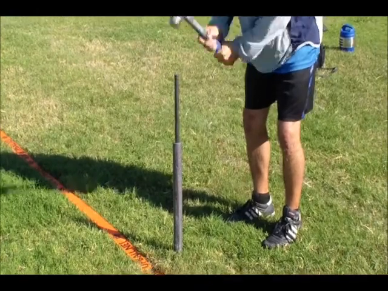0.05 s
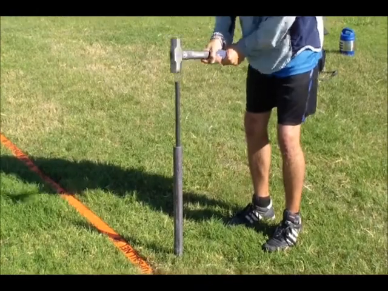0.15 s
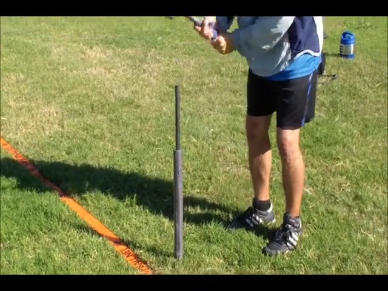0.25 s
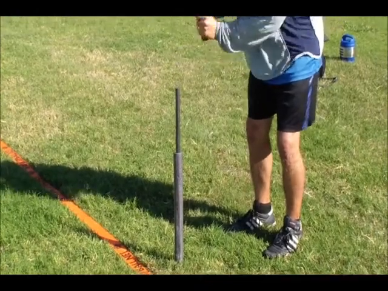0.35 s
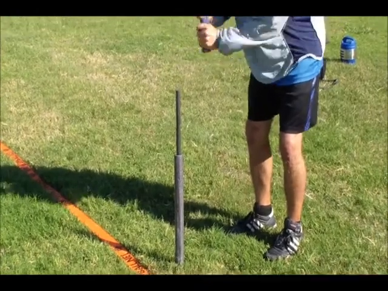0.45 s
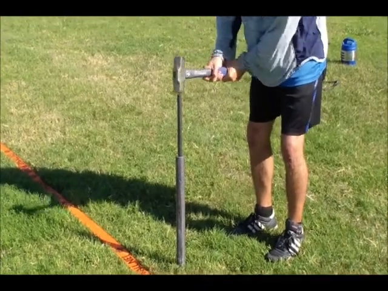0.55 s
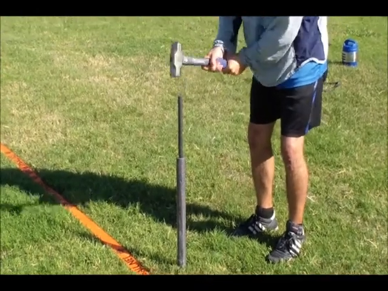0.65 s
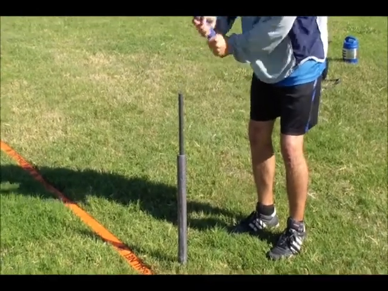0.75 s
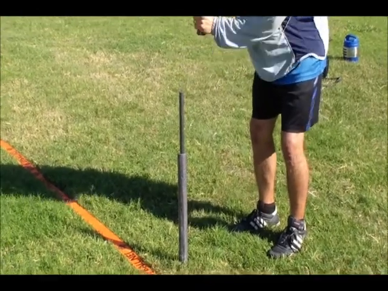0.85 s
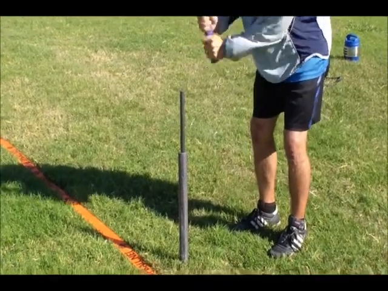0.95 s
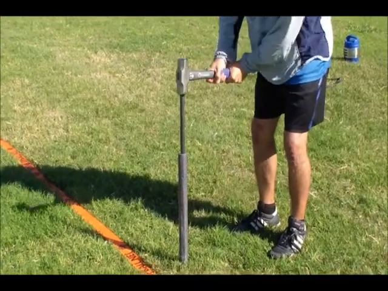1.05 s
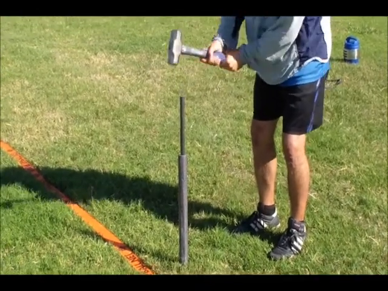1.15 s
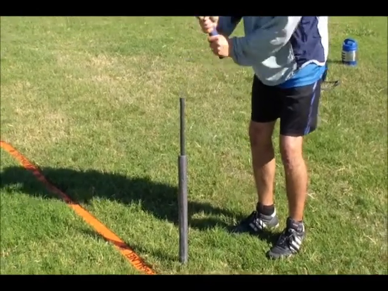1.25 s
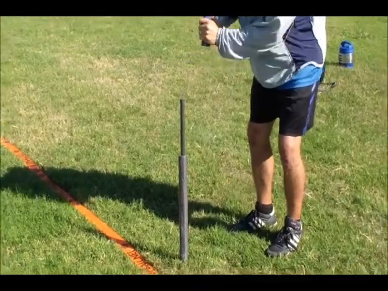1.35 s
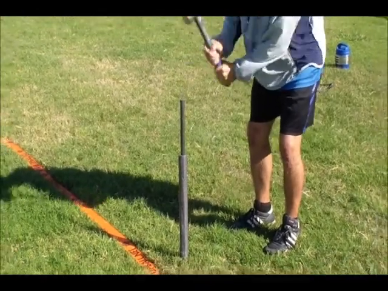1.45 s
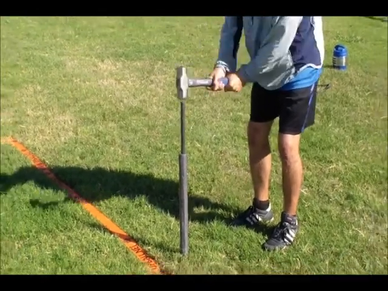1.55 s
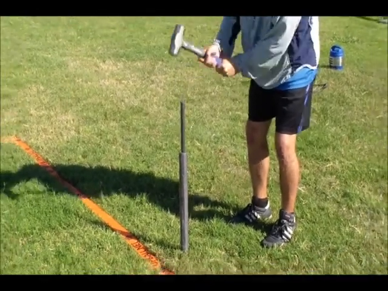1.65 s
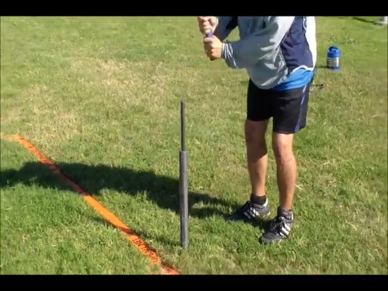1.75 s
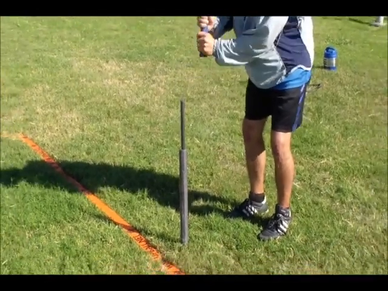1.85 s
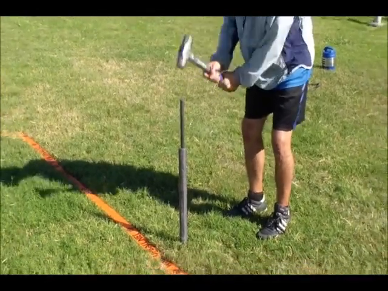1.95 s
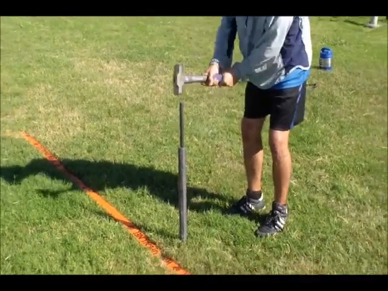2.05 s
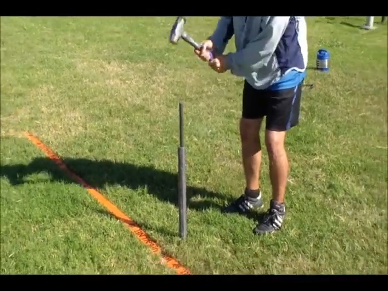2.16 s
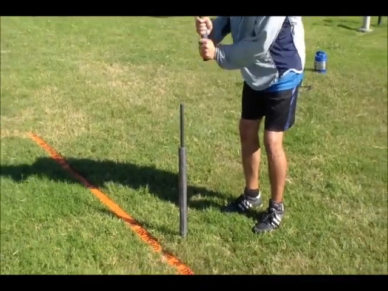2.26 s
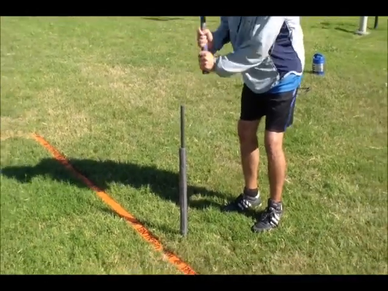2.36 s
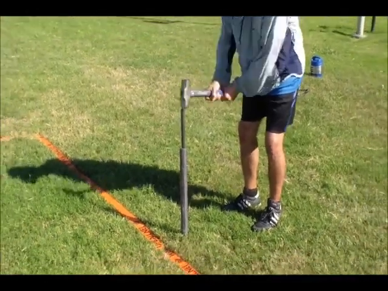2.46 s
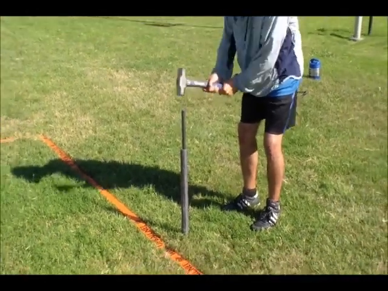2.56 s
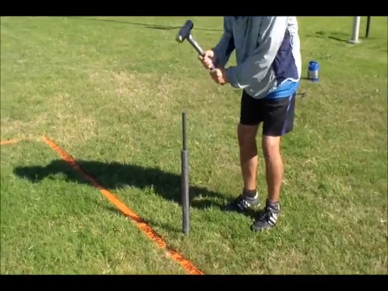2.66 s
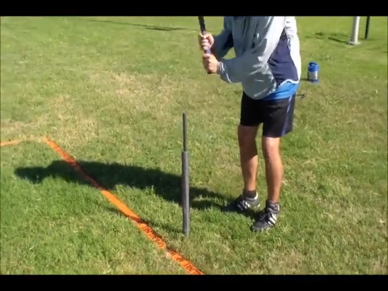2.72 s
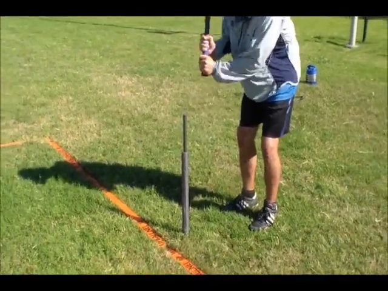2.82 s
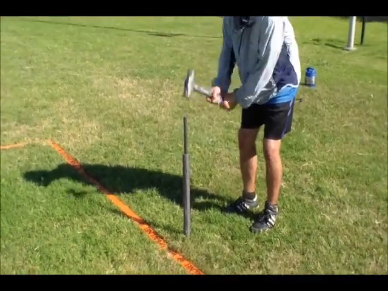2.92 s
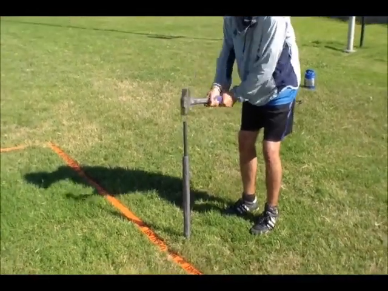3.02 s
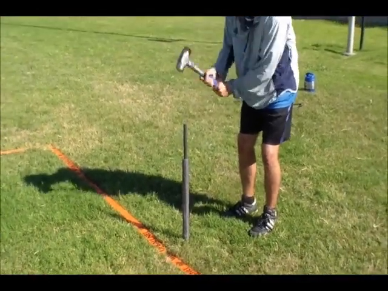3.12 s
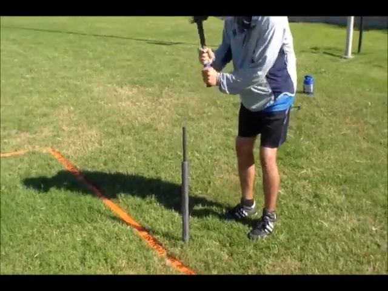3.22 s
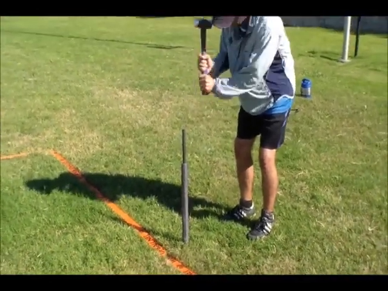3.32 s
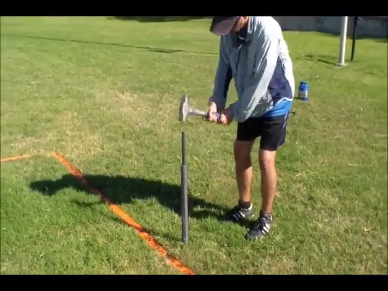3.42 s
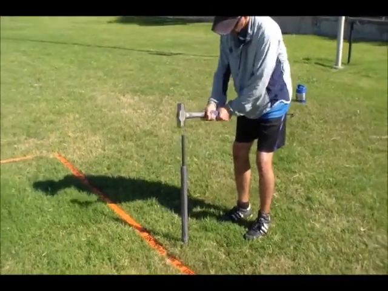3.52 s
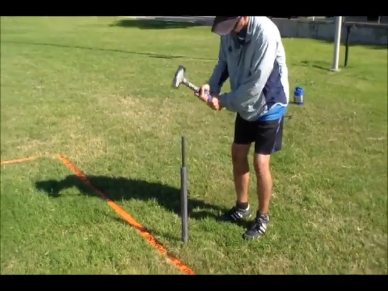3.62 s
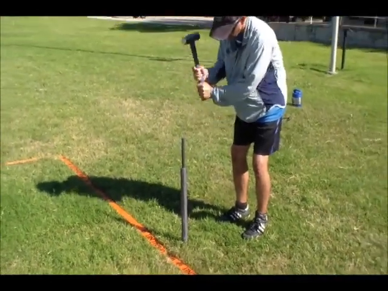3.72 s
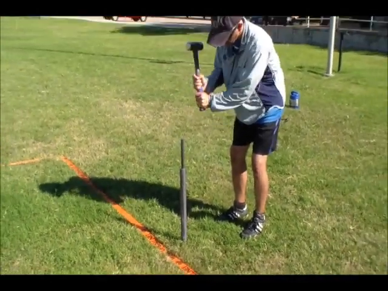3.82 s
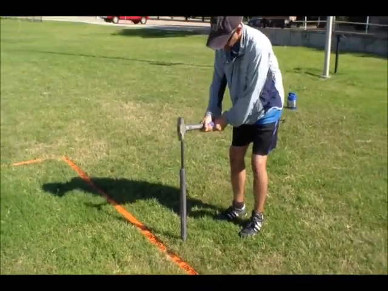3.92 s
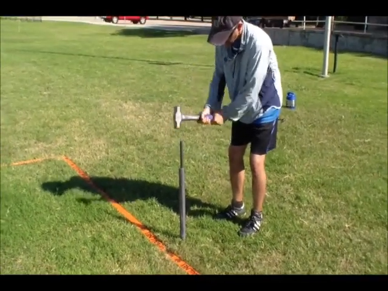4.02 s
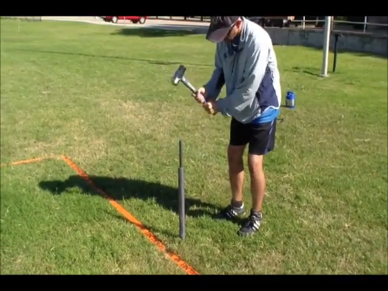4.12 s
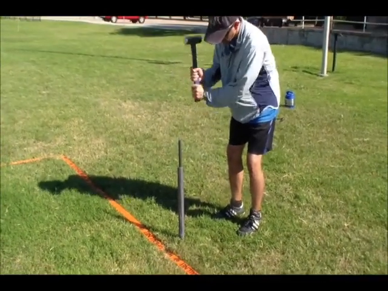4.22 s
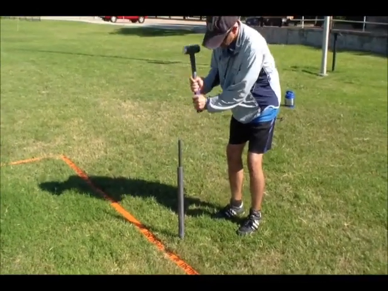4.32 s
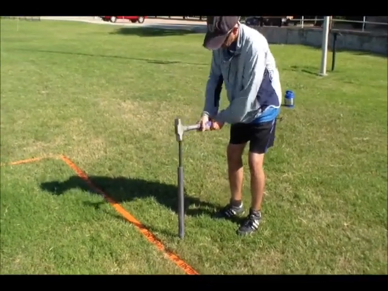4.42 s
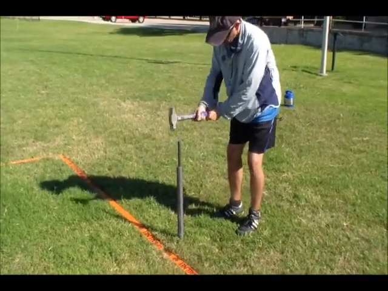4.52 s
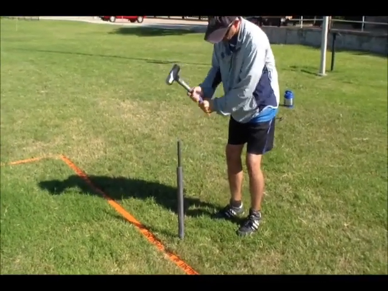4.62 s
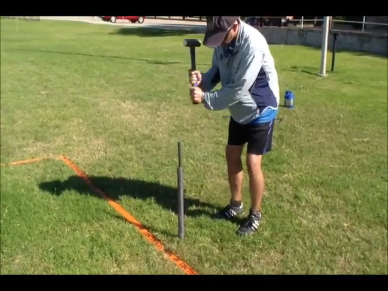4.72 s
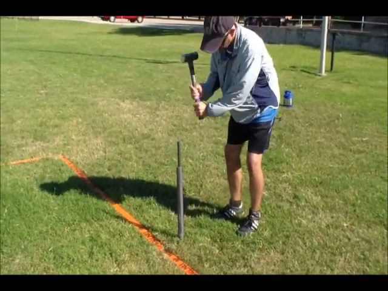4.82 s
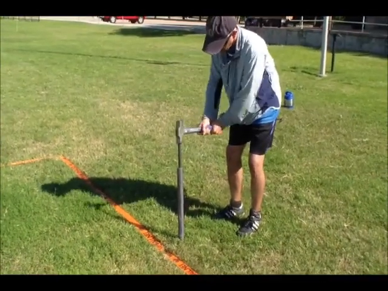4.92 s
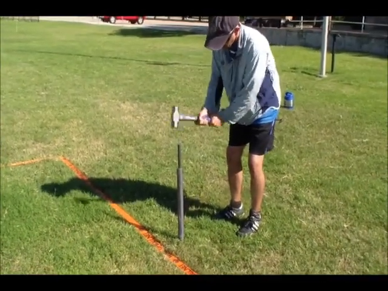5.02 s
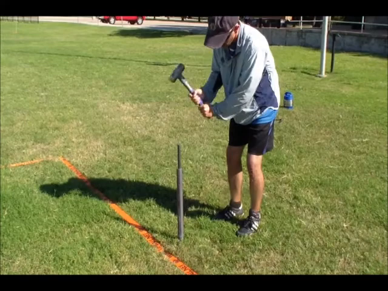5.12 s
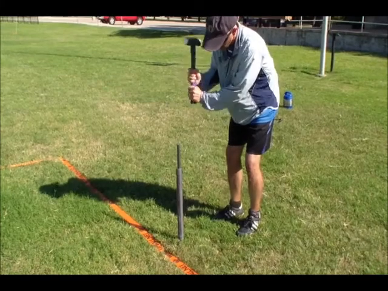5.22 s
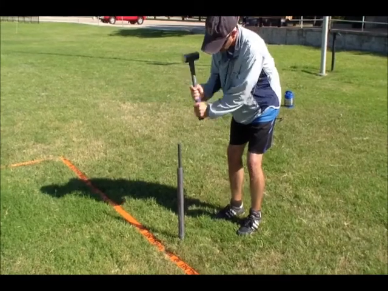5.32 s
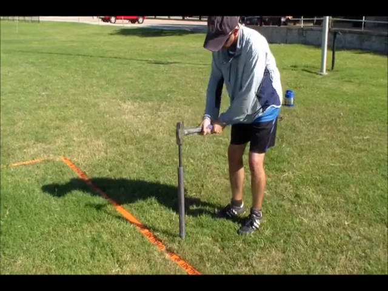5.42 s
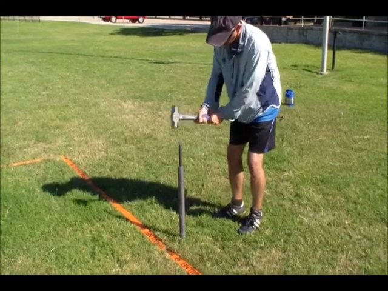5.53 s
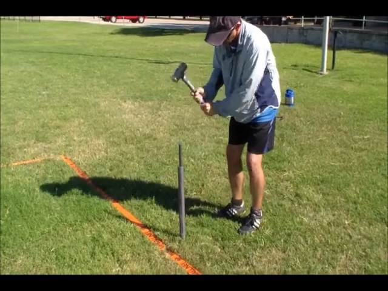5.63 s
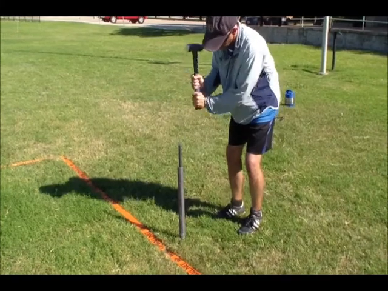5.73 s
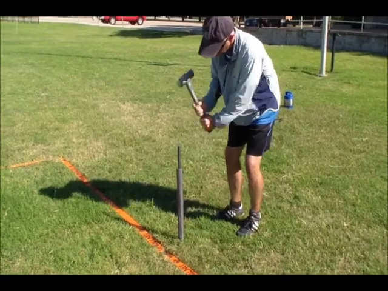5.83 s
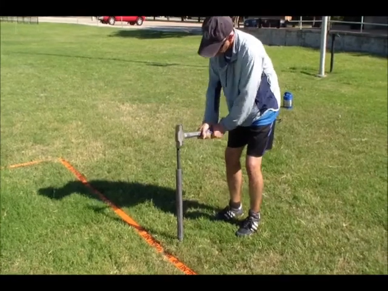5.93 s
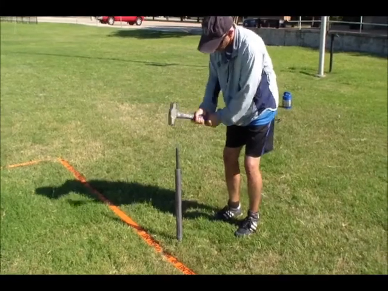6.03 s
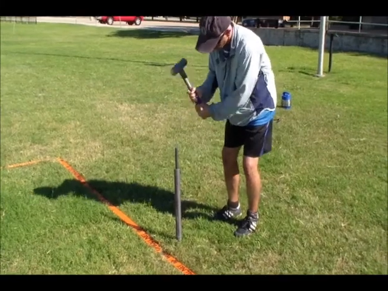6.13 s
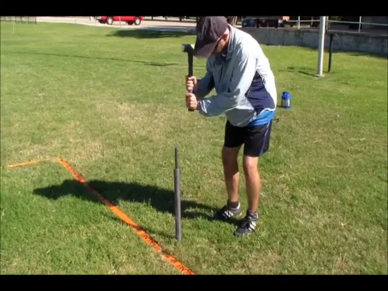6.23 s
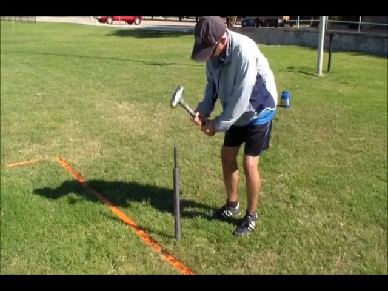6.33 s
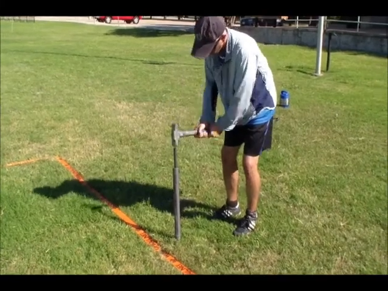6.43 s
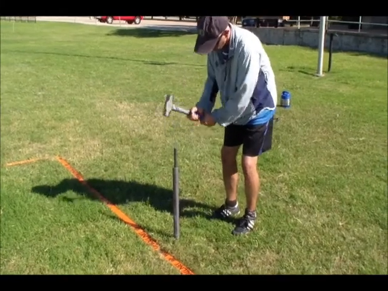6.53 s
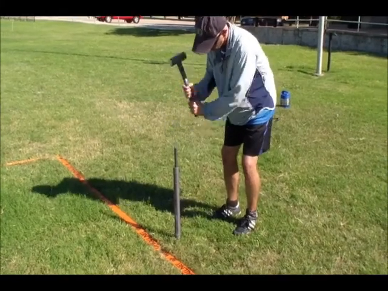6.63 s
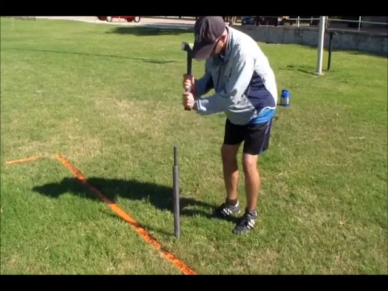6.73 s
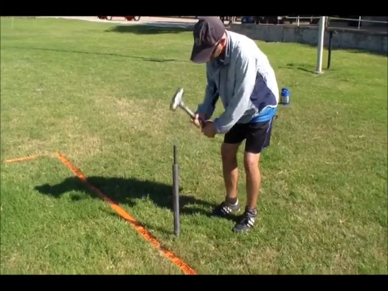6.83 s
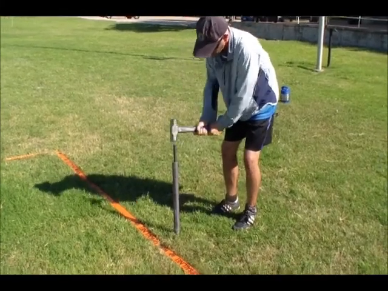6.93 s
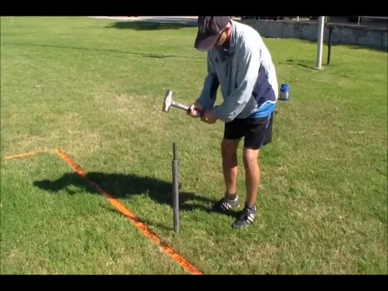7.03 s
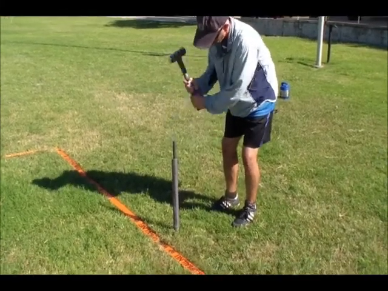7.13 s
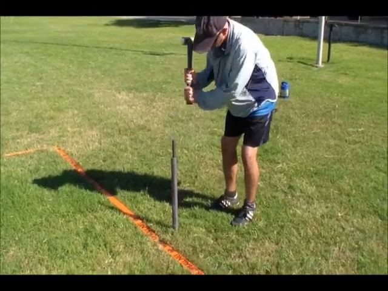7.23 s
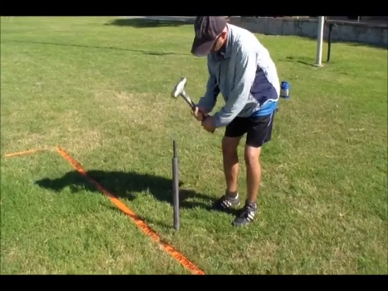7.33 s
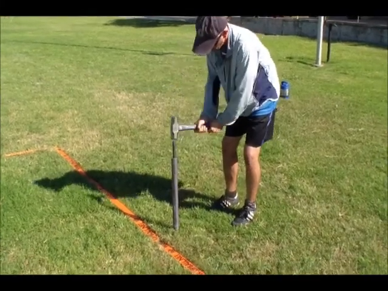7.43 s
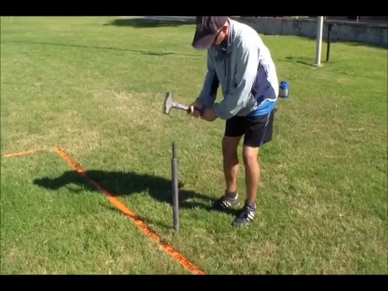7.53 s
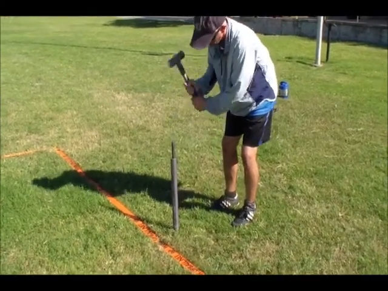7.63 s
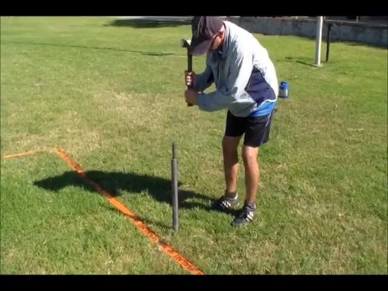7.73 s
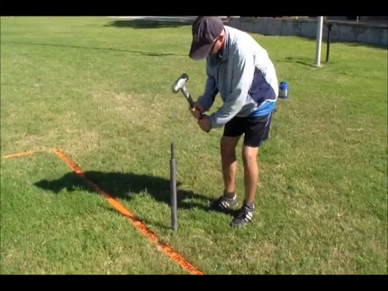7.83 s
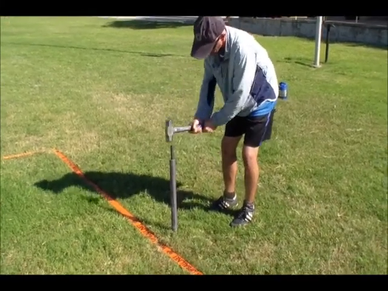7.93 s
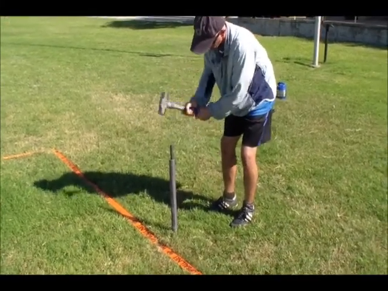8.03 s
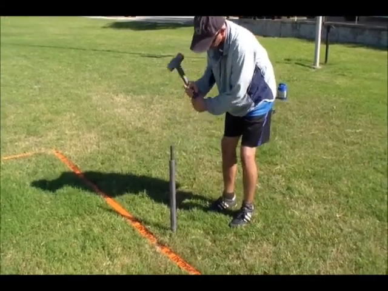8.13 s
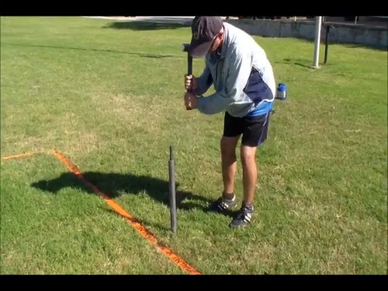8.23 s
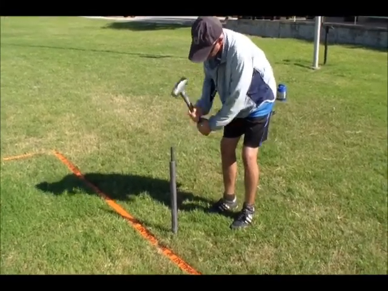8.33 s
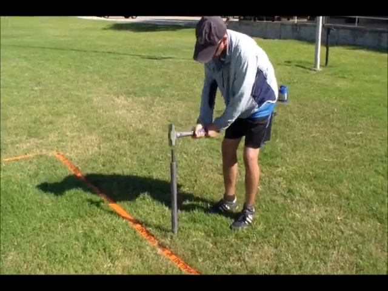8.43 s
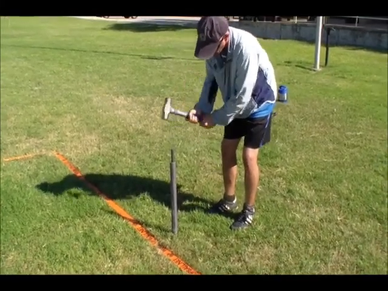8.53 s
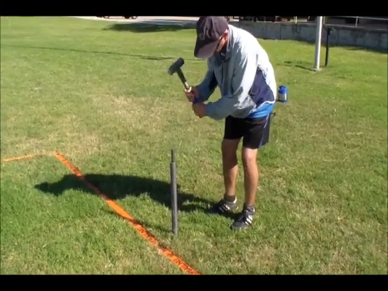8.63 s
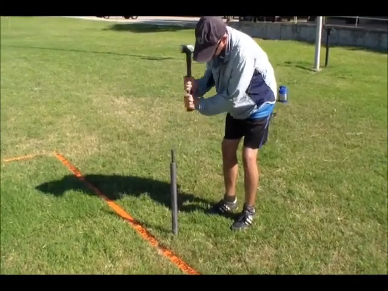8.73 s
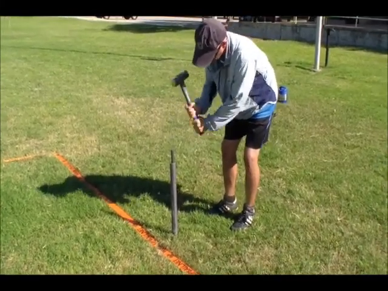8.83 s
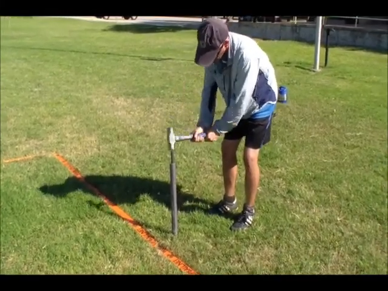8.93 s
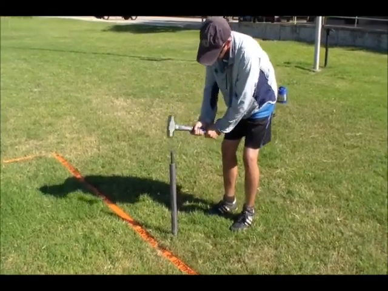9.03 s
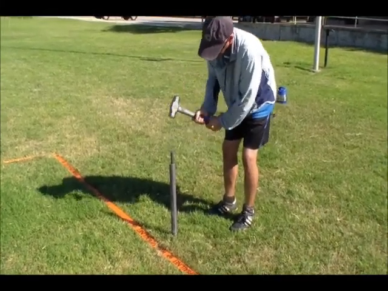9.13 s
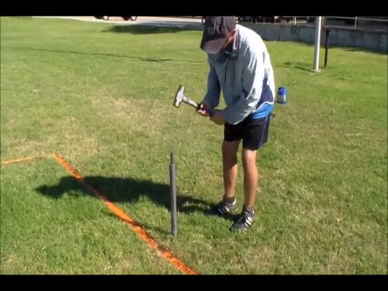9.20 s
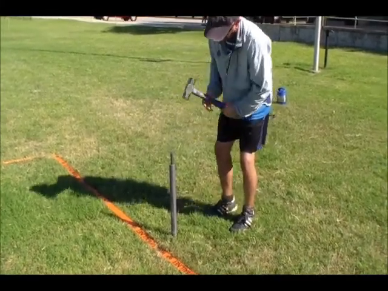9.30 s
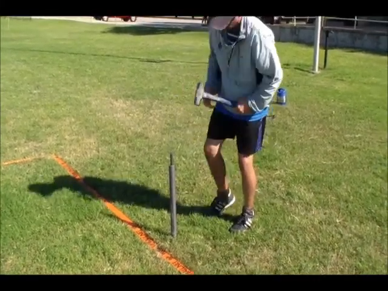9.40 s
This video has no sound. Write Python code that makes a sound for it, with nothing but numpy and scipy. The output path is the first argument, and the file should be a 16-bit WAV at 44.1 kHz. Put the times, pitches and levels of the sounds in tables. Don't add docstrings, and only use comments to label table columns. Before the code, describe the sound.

Steady, overloaded metal-on-metal clanks on an open lawn, each with a quick sleeve rattle and short echo, above distant engine hum and soft insects.

```python
import sys
import numpy as np
from scipy import signal
from scipy.fft import rfft, irfft
from scipy.io import wavfile
from scipy.ndimage import uniform_filter1d

SR = 44100
rng = np.random.default_rng(int(sys.argv[2]) if len(sys.argv) > 2 else 0)


def bounce(signal):
    frames = np.transpose(np.atleast_2d(signal))
    limited = np.clip(frames, -1, 1)
    pcm = np.round(limited * 32767).astype(np.int16)
    wavfile.write(sys.argv[1], SR, pcm)


def attenuation_scalar(level_db):
    decades = np.asarray(level_db, float) / 20
    return 10 ** decades


N = 417230


def evened(x):
    return x / np.sqrt(np.mean(x ** 2) + 1e-20)


def read(points, hz):
    f, value = np.transpose(points)
    return np.interp(np.log(hz + 1), np.log(f + 1), value)


def add(mix, start_s, sound):
    part = mix[round(start_s * SR):][:len(sound)]
    part += sound[:len(part)]


def band(x, lo_hz, hi_hz):
    edges_hz = [lo_hz, min(hi_hz, SR / 2.2)]
    return signal.sosfilt(signal.butter(2, edges_hz, "bandpass", fs=SR, output="sos"), x)


def resonate(x, hz, width_hz):
    turn = np.exp(2j * np.pi * hz * np.arange(x.shape[-1]) / SR)
    r = np.exp(-np.pi * width_hz / SR)
    smooth = signal.lfilter([(1 - r) ** 2], [1, -2 * r, r * r], x / turn)
    return 2 * (turn * smooth).real


def ring(modes, level_db, luck):
    t = np.arange(SR // 2) / SR
    hz, db, t60_s = np.transpose(modes)[:, :, None]
    luck_db = 1.3 * luck[:len(modes), :1]
    phase = 1.3 * luck[:len(modes), 1:]
    decay = attenuation_scalar(level_db + db + luck_db - 60 * t / t60_s)
    return (decay * np.sin(2 * np.pi * hz * t + phase)).sum(0)


# (time [s], strength [dB], knock [dB], off-centre bending [dB], mallet head ring [dB])
BLOWS = [(0.1233, 2.5, -30, -22, -57), (0.5913, 1, -20, -15, -44), (1.0705, 1.5, -16.5, -11.5, -47),
         (1.5437, 0.5, -19.5, -8.5, -41), (2.0205, 2.5, -32, -6, -57), (2.4938, 5.5, -18.5, -6.5, -52),
         (2.9832, 6, -17.5, -9.5, -45), (3.4776, 3, -14.5, -19, -53), (3.9648, 3.5, -19, -15.5, -47),
         (4.4597, 3.5, -13.5, -37, -28.5), (4.9506, 4, -15.5, -16.5, -43), (5.451, 7.5, -15.5, -15, -52),
         (5.9286, 4.5, -13, -11, -51), (6.407, 5, -15.5, -11, -62), (6.9032, 6, -18.5, -31, -44),
         (7.4104, 3.5, -23.5, -16.5, -66), (7.921, 0.5, -19, -29, -46), (8.4212, 5.5, -21, -14.5, -42.5),
         (8.9406, -1, -20, -34, -51)]
# (frequency [Hz], level [dB], t60 [s])
KNOCK_MODES = [
    (370, -10.5, 0.013),
    (760, 1.5, 0.012),
    (990, -7.5, 0.024),
]
# (frequency [Hz], level [dB], t60 [s])
BENDING_MODES = [(1482, -4, 0.0083), (1922, 1.2, 0.0082), (2482, 3, 0.012), (3191, 6, 0.0063),
                 (3978, 2.5, 0.013), (4804, 2.5, 0.012), (6690, -1, 0.013), (7767, 5.5, 0.01),
                 (9850, 1.5, 0.0073), (10824, -3.5, 0.02), (11187, -2, 0.023), (13200, -3.5, 0.01)]
# (frequency [Hz], level [dB], t60 [s])
LENGTHWISE_MODES = [
    (2845, -3.5, .032),
    (5695, -2, .035),
    (8530, -1.5, .032),
    (11330, -6, .033),
    (14200, -13, .03),
]
# (frequency [Hz], level [dB], t60 [s])
HEAD_MODES = [
    (11010, 3, .8),
    (11013.6, 2.6, .8),
]


def blows():
    lengthwise_db, near_lengthwise_db = -8, 0.5
    out_crack_db, out_bending_db, out_lengthwise_db = 10, -2.5, 10.5
    out, t = np.zeros((2, N)), np.arange(SR // 2) / SR
    luck = rng.standard_normal((len(BLOWS), 4, 16, 2))
    noises = rng.standard_normal((len(BLOWS), SR // 2))
    lifted = np.exp(-(t / 0.235) ** 4)
    for (s, db, knock_db, bend_db, head_db), chance, noise in zip(BLOWS, luck, noises):
        bending = ring(KNOCK_MODES, db + knock_db + 6.5, chance[0])
        bending += ring(BENDING_MODES, db - 10, chance[1])
        bending += ring(BENDING_MODES[:2], db + bend_db + 6.5, chance[2])
        crack = attenuation_scalar(db - 7 - 60 * t / 0.018) * band(noise, 900, 11000)
        lengthwise = ring(LENGTHWISE_MODES, lengthwise_db, chance[3])
        add(out[0], s, crack + bending + attenuation_scalar(near_lengthwise_db) * lengthwise)
        outward = attenuation_scalar(out_crack_db) * crack + attenuation_scalar(out_bending_db) * bending
        add(out[1], s, outward + attenuation_scalar(out_lengthwise_db) * lengthwise)
        add(out[0], s, lifted * ring(HEAD_MODES, head_db, np.zeros((16, 2))))
    return out


# (time [s], level [dB])
BOUNCES = [(0.144, -13), (0.6075, -11), (1.084, -4.5), (1.5562, -9), (2.0356, -9.5), (2.5103, -4),
           (2.997, -4), (3.4683, -21.5), (3.4897, -20), (3.979, -13), (4.47, -1.5), (4.964, -17),
           (5.4633, -7.5), (5.9424, -6.5), (6.4195, -12.5), (6.9165, -8), (7.4238, -10.5), (7.9357, -13),
           (8.4384, -6), (8.952, -36)]


def bounces():
    sleeve_hz, sleeve_t60_s, rise_s = 2500, 0.019, 0.0006
    out, t = np.zeros(N), np.arange(1500) / SR
    for (s, db), noise in zip(BOUNCES, rng.standard_normal((len(BOUNCES), 1500))):
        clack = np.minimum(t / rise_s, 1) * evened(band(noise, sleeve_hz / 6, sleeve_hz * 1.7))
        add(out, s, attenuation_scalar(db - 60 * t / sleeve_t60_s) * clack)
    return out


# (delay [s], level [dB], low edge [Hz], high edge [Hz], left minus right [dB])
WALLS = [
    (0.046, -29.5, 2170, 12000, -7),
    (0.069, -26.5, 1170, 11900, 6),
    (.1005, -56, 2500, 6660, 1),
    (0.1094, -20.5, 1290, 1740, -1),
    (0.11, -30, 2480, 5000, -1.5),
    (0.1375, -38, 2500, 3300, -2),
]


def walls(x):
    out = np.zeros((2, N))
    for delay_s, db, lo_hz, hi_hz, pan_db in WALLS:
        late = round(delay_s * SR)
        gain = attenuation_scalar(db + np.array([[pan_db / 2], [-pan_db / 2]]))
        out[:, late:] += gain * band(x, lo_hz, hi_hz)[:N - late]
    return out


# (frequency [Hz], level [dB])
SCATTER_COLOUR = [(500, -1.5), (1200, -6), (3000, -0.2), (6000, -3.5), (9000, -11.5), (13000, -16.5),
                  (17000, -8)]


def trees(x):
    trees_s, rise_s, trees_db, trees_fade_db_per_s = 0.064, 0.01, -32.5, 144
    far_db, far_fade_db_per_s = -74, 61
    out, length = np.zeros((2, N)), SR // 2
    after = np.arange(length) / SR - trees_s
    near_fade_db = trees_db - trees_fade_db_per_s * after
    far_fade_db = far_db - far_fade_db_per_s * (after - 0.2)
    shape = np.clip(after / rise_s, 0, 1) ** 4 * attenuation_scalar(np.maximum(near_fade_db, far_fade_db))
    colour = attenuation_scalar(read(SCATTER_COLOUR, np.fft.rfftfreq(length, 1 / SR)))
    for k in range(3):
        taps = rng.standard_normal((3, length)) * (rng.random((3, length)) < 0.06)
        taps = (0.28 * taps[0] + 0.37 * taps[1:]) * shape
        taps = irfft(rfft(taps) * colour, length)
        share = np.sqrt(2 / 3) * np.cos(np.pi * (np.arange(N) / SR * 0.7 + k / 3))
        out += signal.oaconvolve((x * share)[None], taps, axes=1)[:, :N]
    return out


# (frequency [Hz], level per Hz [dB])
RUMBLE = [(12, -21), (20, 0), (71, 0), (114, 1), (156, -14.5), (230, -10), (342, -19.5), (700, -45)]
# (frequency [Hz], level per Hz [dB])
BREEZE = [(200, -53), (342, -28), (690, -20), (1470, -27.5), (3420, -29), (4660, -32), (15200, -46.5),
          (16500, -63)]
# (frequency [Hz], left-right correlation [-1..1])
LIKENESS = [(60, 0.95), (130, 0.96), (400, 0.78), (700, 0.9), (1400, 0.6), (3100, 0.41), (7000, 0.046),
            (15000, 0.21)]
# (frequency [Hz], left minus right [dB])
LEAN = [(25, 9), (60, 0.5), (200, 0.1), (1000, 0)]


def air():
    air_db = -34.5 - 1.76
    frames, hz = N // 256 + 5, np.fft.rfftfreq(1024, 1 / SR)
    a, b, c, d, patches = rng.standard_normal((frames, 513, 5)).T
    patches = evened(uniform_filter1d(uniform_filter1d(patches, 8, 0), 12, 1))
    same = np.clip(read(LIKENESS, hz), -1, 1)[:, None]
    left = a + 1j * b
    right = same * left + np.sqrt(1 - same ** 2) * (c + 1j * d)
    colour = np.hypot(attenuation_scalar(read(RUMBLE, hz)), attenuation_scalar(read(BREEZE, hz)))[:, None]
    lump_db = (-1 + 2.45 / (1 + hz[:, None] / 300)) * patches
    lean_db = read(LEAN, hz)[:, None] / 2
    z = np.array([left, right]) * colour * attenuation_scalar(lump_db + np.array([lean_db, -lean_db]))
    return attenuation_scalar(air_db) * evened(signal.istft(z, nperseg=1024, noverlap=768)[1][:, :N])


# (frequency [Hz], width [Hz], level [dB])
HUM = [
    (74.6, 17.6, -49),
    (121.3, 18, -48),
    (189.1, 19, -53),
    (243.5, 11.7, -62.5),
]


def hum(noise):
    return sum(attenuation_scalar(db) * evened(resonate(noise, hz, width_hz)) for hz, width_hz, db in HUM)


def insects(noise):
    t = np.arange(N) / SR
    near_db = np.maximum(-53 - 2.5 * t, -83)
    swell_db, swell_top_s, swell_period_s = 3.5, 0.64, 12
    far_db = -59 + swell_db * np.cos(2 * np.pi * (t - swell_top_s) / swell_period_s)
    near = attenuation_scalar(near_db) * evened(resonate(noise, 2600, 170))
    return near + attenuation_scalar(far_db) * evened(resonate(noise, 3420, 360))


def rustle(noise):
    start_s, rise_s, start_db, growth_db_per_s = 9.23, 0.039, -61, 55
    since = np.arange(N) / SR - start_s
    level = np.clip(since / rise_s, 0, 1) * attenuation_scalar(start_db + growth_db_per_s * since)
    return level * evened(band(noise, 6700, 14000))


def chirp():
    start_s, hz, level_db, length_s = 9.388, 2950, -46, 0.022
    out, t = np.zeros(N), np.arange(0, length_s, 1 / SR)
    add(out, start_s, attenuation_scalar(level_db) * np.sin(np.pi * t / length_s) * np.sin(2 * np.pi * hz * t))
    return out


def scene():
    near, outward = blows() + bounces()
    side = attenuation_scalar(-16) * band(np.roll(near, 3), 2560, 19300) + attenuation_scalar(-38) * band(near, 100, 860)
    stake = near + np.array([side, -side])
    returns = walls(outward) + trees(outward)
    background = air()
    noise = rng.standard_normal((2, N))
    background += hum(noise[0]) + insects(noise) + rustle(noise) + chirp()
    return stake + returns + background


def low_pass(x):
    return signal.sosfilt(signal.butter(12, 17110, fs=SR, output="sos"), x)


def record(dry):
    leap_db, grab_s, grab_db = 17, 0.0021, -7
    sink_s, depth_db, recover_s = 0.024, -26.5, 0.13
    n = np.arange(N)
    last = np.maximum.accumulate(np.where(abs(dry).max(0) > 0.6, n, -SR))
    fresh = (last == n) & (n - np.r_[-SR, last[:-1]] > SR // 5)
    since = (n - np.maximum.accumulate(np.where(fresh, n, -SR))) / SR
    duck_db = np.interp(since, [0, grab_s, sink_s, sink_s + recover_s], [leap_db, grab_db, depth_db, 0])
    bass = signal.oaconvolve(dry, signal.firwin(1001, 260, fs=SR)[None], "same")
    ducked = (dry - bass) * attenuation_scalar(duck_db) + bass * attenuation_scalar(0.58 * duck_db)
    clipped = ducked / (1 + (ducked / 0.71) ** 6) ** (1 / 6)
    smooth = signal.oaconvolve(clipped, signal.firwin(301, 15800, fs=SR)[None], "same")
    smooth += attenuation_scalar(-22) * (since < 0.004) * (clipped - smooth)
    return low_pass(smooth)


dry = scene()
out = record(dry)
bounce(out)
```